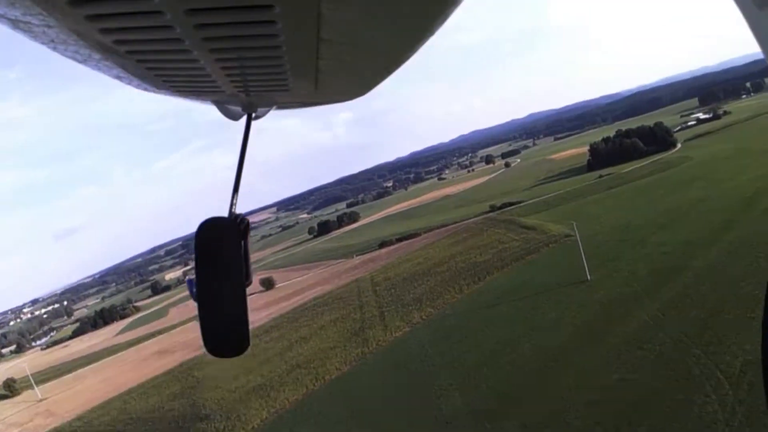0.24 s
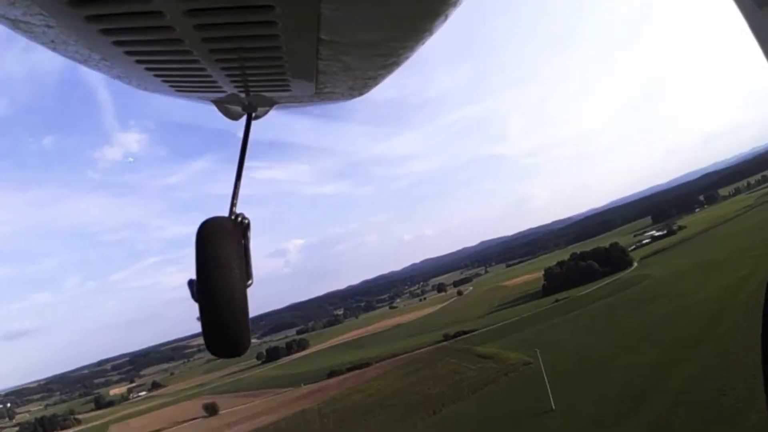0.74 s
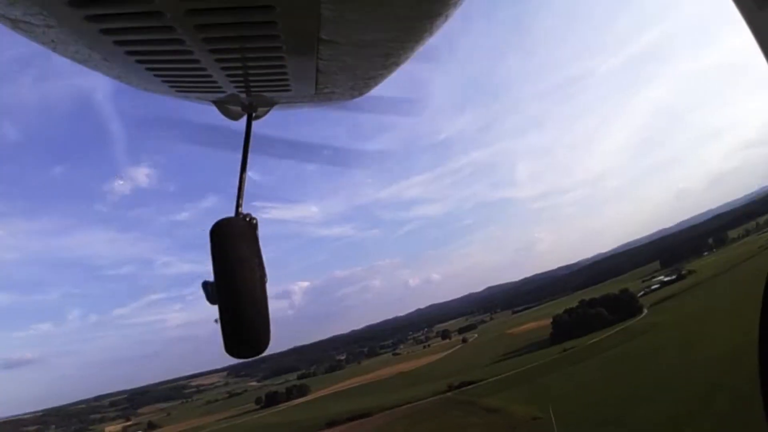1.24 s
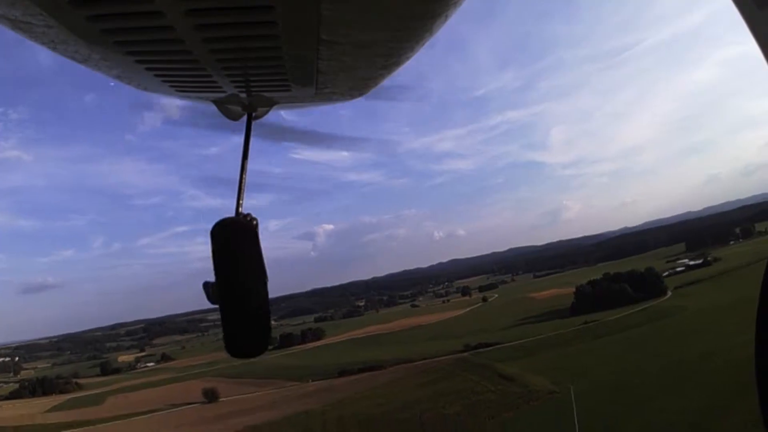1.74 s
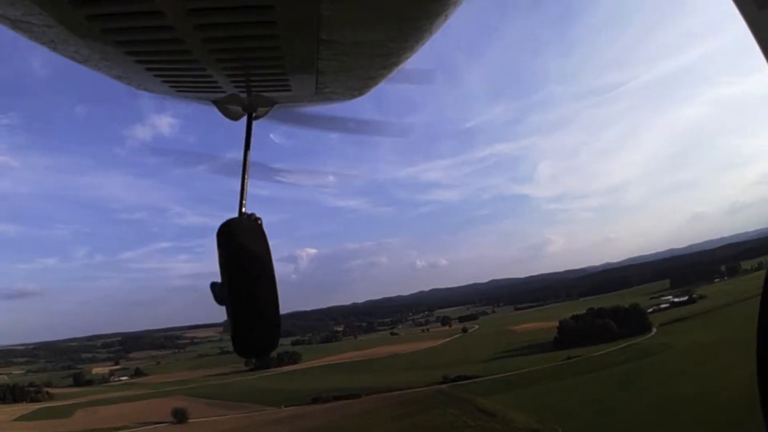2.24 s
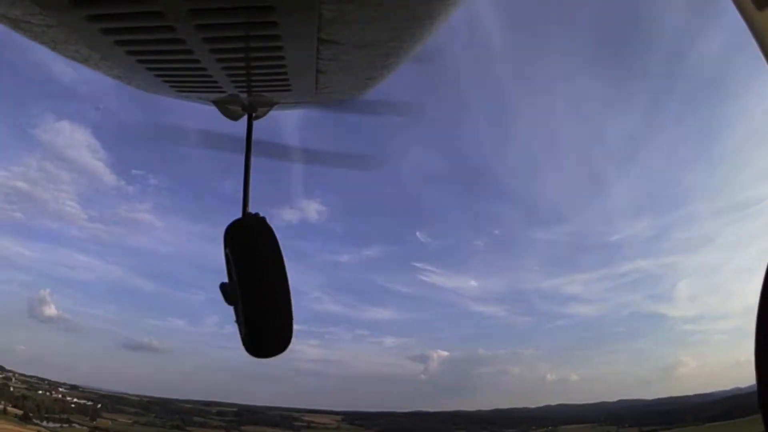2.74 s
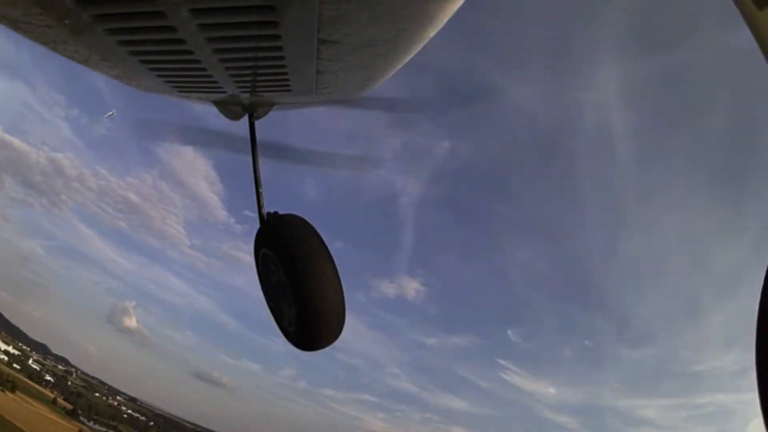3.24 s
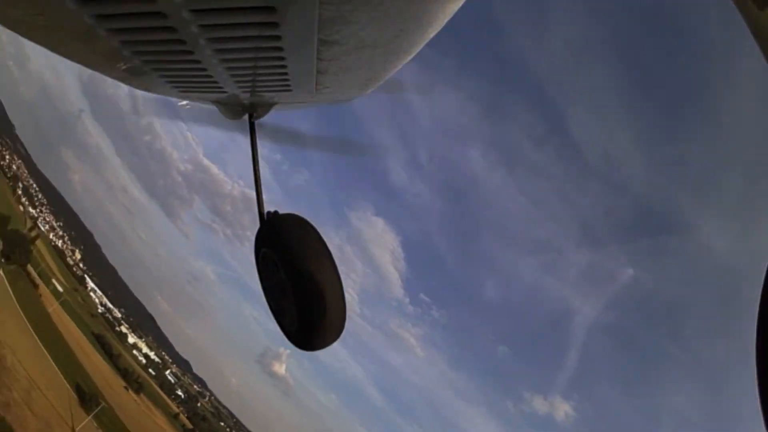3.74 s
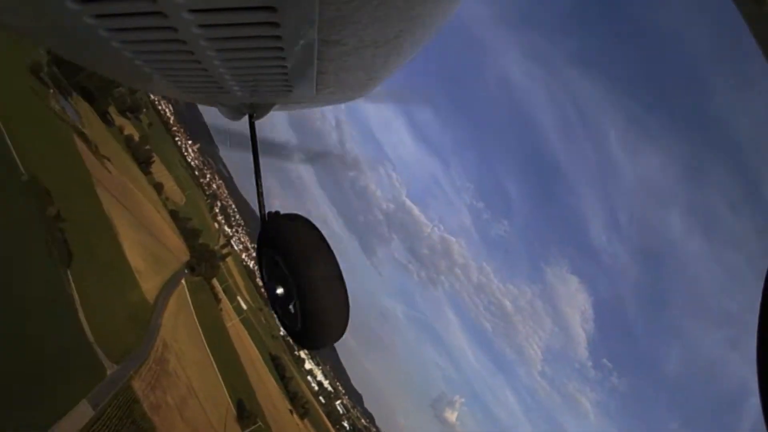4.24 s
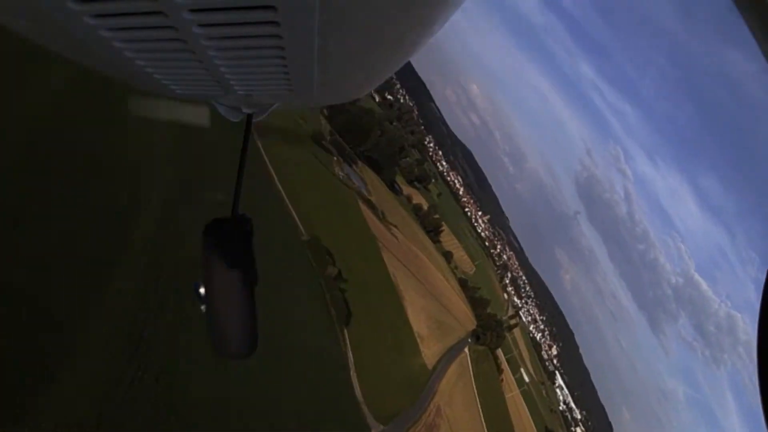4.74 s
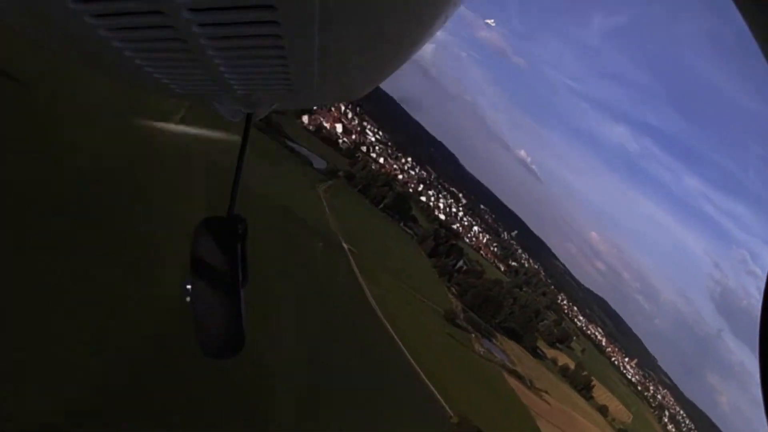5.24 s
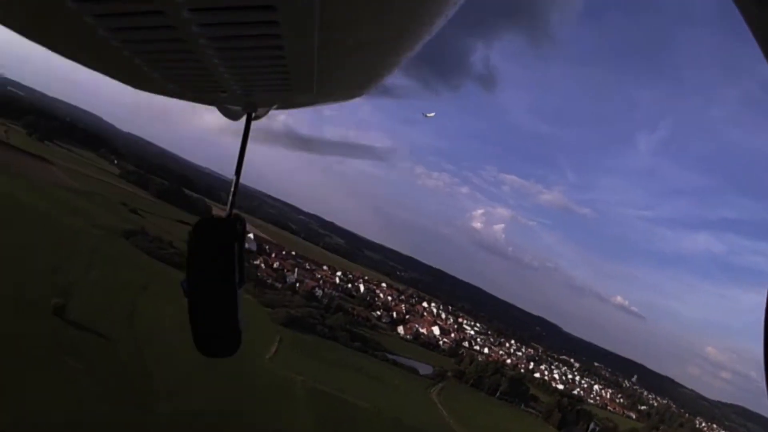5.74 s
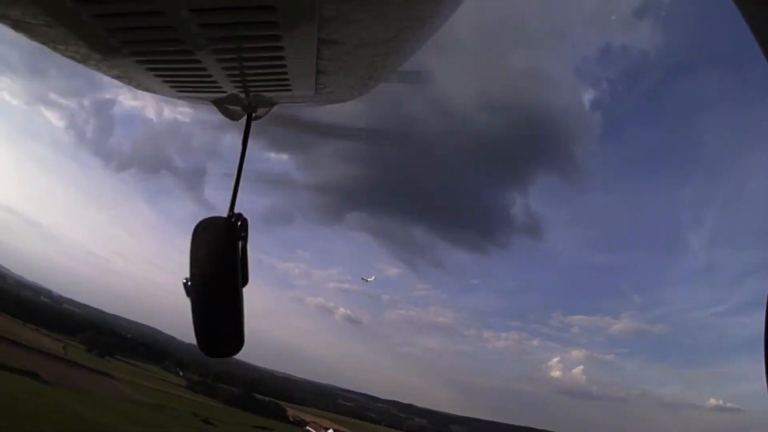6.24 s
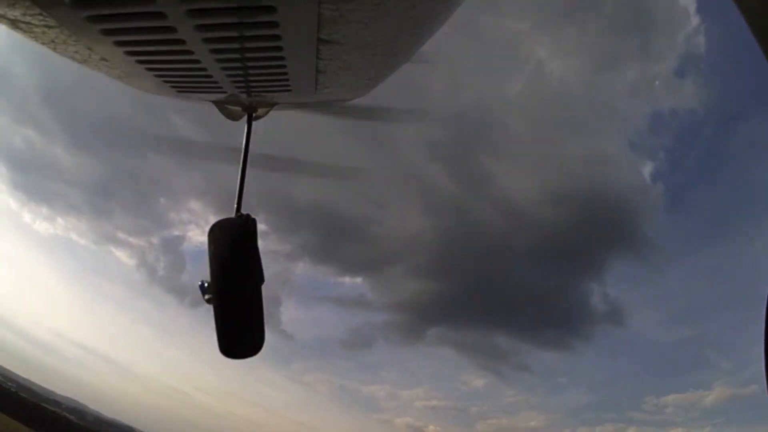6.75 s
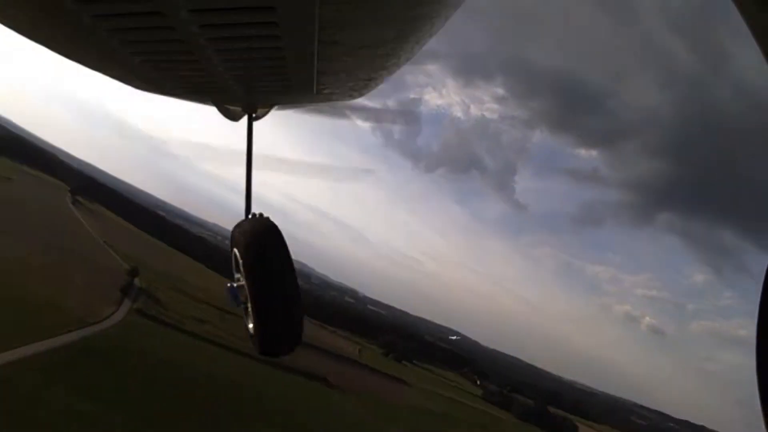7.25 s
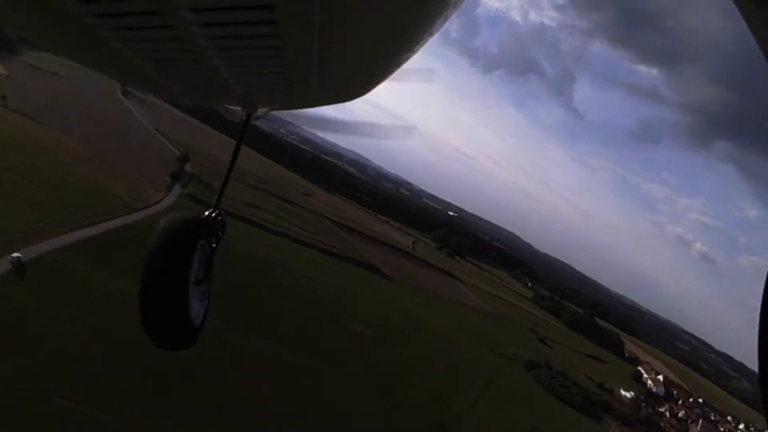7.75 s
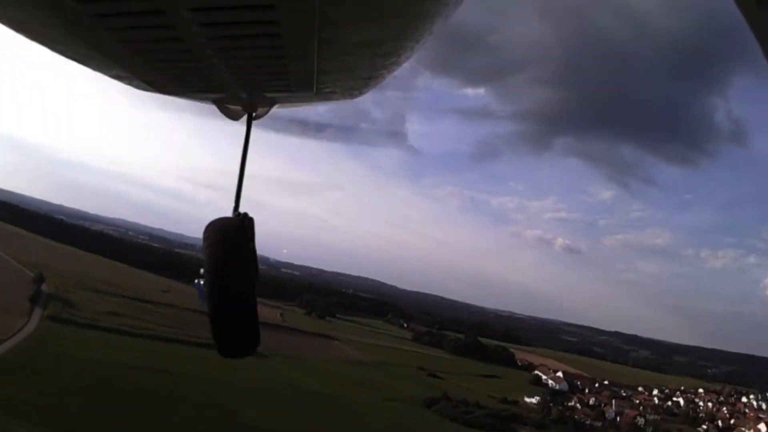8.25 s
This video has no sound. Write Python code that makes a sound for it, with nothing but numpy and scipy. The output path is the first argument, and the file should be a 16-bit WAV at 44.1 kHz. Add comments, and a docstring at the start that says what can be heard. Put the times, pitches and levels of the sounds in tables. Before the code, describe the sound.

A model plane's electric motor and propeller are heard in flight from a microphone under the airframe, out in the wind. For the first three seconds the propeller holds a steady, buzzy drone, mixed with low buffeting and a gusty rush of air. From about 3.1 seconds the throttle eases: the drone slides down in pitch and softens, the wind drops, and a thin, high electronic whistle joins the motor's whine. Around 4.1 to 4.9 seconds, as the pitch reaches its lowest point, a loose part buzzes and rattles in quick bursts. From about 4.7 seconds the motor climbs again in gradual steps and the drone fills back out. A second, lighter rattle comes at about 7.3 to 7.8 seconds. Near 8 seconds the pitch rises further and the wind swells, staying strong until the end at 8.5 seconds.

```python
"""Under an electric model plane

In flight, heard from a camera microphone under the airframe, close to the motor and out in the wind.
The two-blade propeller drones in rushing air. The throttle eases back: the pitch dips, the speed
controller whistles, the motor's magnets sing and a loose part buzzes. Then the plane gathers speed."""
import sys
import numpy as np
from scipy import signal
from scipy.fft import rfft, irfft
from scipy.io import wavfile
from scipy.ndimage import uniform_filter1d

SR = 44100
rng = np.random.default_rng(int(sys.argv[2]) if len(sys.argv) > 2 else 0)


def transcribe(signal):
    """Save signal, clipped to [-1, 1], as a 16-bit WAV file at the path in sys.argv[1]."""
    frames = np.atleast_2d(signal).T
    limited = np.clip(frames, -1, 1)
    pcm = np.round(limited * 32767).astype(np.int16)
    wavfile.write(sys.argv[1], SR, pcm)


N = 374850
TIME = np.arange(N) / SR

# Propeller speed in blade passes a second: time_s, blade_hz
BLADE_RATE = [(0, 150.5), (3.13, 150.4), (3.26, 144.2), (3.4, 135.7), (3.5, 131.1), (3.65, 127.6),
              (3.82, 124.6), (4.07, 118.6), (4.48, 112.8), (4.62, 112.2), (4.86, 117.7), (4.98, 120.2),
              (5.17, 122.2), (5.62, 122.8), (5.78, 125.3), (6, 127.3), (6.2, 127.7), (6.4, 130.8),
              (6.62, 132.3), (7.74, 131.9), (8, 139.2), (8.2, 142), (8.5, 143.3)]
# The two lowest propeller tones: time_s, blade_db, octave_db
DRONE_LEVELS = [(0, -39, -33), (0.75, -39.5, -34.5), (1.1, -36, -37.5), (1.45, -42, -37.5),
                (2.1, -37.5, -38.5), (2.68, -39.5, -36), (2.85, -40.5, -48), (3.45, -40, -51),
                (3.85, -53, -57), (4.2, -53, -70), (4.6, -43, -54), (5.05, -54, -50), (5.5, -46, -38),
                (6, -43.5, -38.5), (6.4, -36.5, -43.5), (7.2, -39.5, -41), (7.75, -38.5, -42.5),
                (8.15, -34.5, -38), (8.5, -38, -43)]
# Fourth propeller harmonic, swelling and fading: time_s, level_db
FOURTH_HARMONIC = [(0, -52), (0.65, -56), (1, -53), (1.6, -53), (2.1, -49.5), (2.6, -57), (3.3, -52),
                   (3.8, -61), (4.05, -51.5), (4.5, -56.5), (4.85, -58.5), (5.15, -69), (5.4, -50),
                   (5.62, -72), (6, -50), (6.5, -64.5), (7, -55), (7.35, -62), (7.9, -56), (8.5, -51)]
# Sixth propeller harmonic, coming and going: time_s, level_db
SIXTH_HARMONIC = [(0, -58.5), (2.5, -55.5), (3.1, -71), (4.2, -76), (4.5, -63), (4.9, -72), (6.6, -78),
                  (7.15, -56.5), (7.5, -66), (7.9, -79), (8.35, -49.5), (8.5, -49)]
# Other propeller harmonics: blade_multiple, level_db, share_of_octave_swell, speed_exponent
UPPER_HARMONICS = [(3, -47.5, 0, 10.1), (5, -63.5, 0, 2.7), (7, -66, 0.1, 7), (8, -60.5, 0.01, 3.7),
                   (9, -67, 0, 4), (10, -64, 0.24, 4.1)]

# The motor's magnetic tones: blade_multiple, level_db
MAGNET_TONES = [(7, -63), (10, -66), (11, -66), (12, -58.5), (14, -53), (14.5, -67), (28, -60.5),
                (29.5, -56), (31, -81), (33.5, -74)]
# The hum stands out at low speed and sinks as the motor pulls: blade_hz, gain_db
HUM_GAIN = [(112, -4), (119, -1), (123, -9.5), (131, -9.5), (150, -10.5)]
# How well the airframe radiates motor vibration: pitch_hz, gain_db
AIRFRAME_RESPONSE = [(790, -9), (835, 1.5), (1150, 7.5), (1340, 3), (1450, 10), (1530, -1), (1595, 0),
                     (1670, -1.5), (1720, 0), (1800, -5.5), (1900, -10), (2000, -1.5), (2150, -11),
                     (2400, -22), (2480, -3), (2590, 8.5), (2680, 2.5), (2850, -19), (3150, -8), (3300, -6),
                     (3470, -15), (3700, -8.5), (4100, -18), (5200, -11.5), (5310, 1.5), (5500, 4),
                     (5720, -2), (5900, -7), (6150, -4), (6320, -7)]
# Resonances of the falling beat tone, relative to the controller's whistle: pitch_hz, gain_db
FALLING_BEAT_RESPONSE = [(1590, -4), (1660, -15), (1730, -16), (1810, -23), (1950, -23), (2100, -30),
                         (2270, -34), (2440, -28), (2560, -16), (2680, -15.5), (2800, -21.5), (3000, -26),
                         (3230, -20), (3560, -33), (4500, -35)]
# Colour of the fizz around that whistle: frequency_hz, density_db
FIZZ_SPECTRUM = [(6000, -30), (6900, -10), (7500, 4), (8150, 4), (8400, -12), (8750, -34)]

# Single hard knocks of the loose part: time_s, force_db
HARD_KNOCKS = [(4.1003, -44), (4.194, -39), (4.2118, -37), (4.23, -36), (4.2553, -31), (4.2613, -34),
               (4.266, -35), (4.2992, -41), (4.3245, -37), (4.3333, -28.5), (4.3368, -29), (4.3403, -32),
               (4.376, -34), (4.394, -40), (4.4466, -34), (4.464, -32), (4.4812, -30), (4.534, -32),
               (4.6328, -26), (4.6685, -32), (4.747, -33), (7.277, -38), (7.307, -33.5), (7.3375, -34),
               (7.356, -36), (7.3855, -34), (7.4015, -40), (7.4378, -40), (7.4676, -34), (7.474, -37),
               (7.482, -34), (7.5042, -36), (7.5338, -47), (7.5643, -41), (7.5813, -40), (7.5994, -33),
               (7.619, -36), (7.6277, -34), (7.6402, -35), (7.678, -39), (7.754, -41), (7.7695, -39),
               (7.777, -40)]
# Its spells of buzzing: start_s, end_s, force_db, edge_db (extra on the modes near 4 kHz)
BUZZ_BURSTS = [(4.202, 4.44, -52, -6), (4.447, 4.485, -31.5, 1.5), (4.522, 4.701, -31, -3),
               (4.746, 4.76, -32.5, 1), (4.776, 4.86, -31, -3.5), (4.88, 4.935, -45, -11),
               (7.288, 7.526, -48.5, 1.5), (7.315, 7.365, -46, 2), (7.372, 7.408, -38, 1),
               (7.455, 7.5, -42, 2.5), (7.56, 7.635, -43, 1.5), (7.677, 7.68, -47, 3),
               (7.748, 7.8, -45, -2)]
# Its ringing modes: pitch_hz, gain_db, t60_s
PART_MODES = [(1470, -8, 0.011), (2200, -8, 0.0038), (2650, -7, 0.0057), (3105, -3, 0.0076),
              (3600, -9, 0.0038), (4050, -7, 0.0058), (4520, -16, 0.0033), (5580, -17, 0.0064),
              (6480, -16, 0.007), (7450, -19, 0.0094), (8250, -24, 0.0059), (8970, -24, 0.012),
              (12300, -24, 0.0044)]

# Airflow over the camera, relative to level flight: time_s, flow_db
FLOW_STRENGTH = [(0, 0.1), (0.5, -0.2), (1.25, 1.5), (1.75, -0.5), (2.42, 2), (2.85, -3.5), (3.35, -4),
                 (3.8, -9.5), (4.6, -6), (5.1, -6.5), (5.7, -3), (6.9, -3), (7.75, -4.5), (8.15, 2),
                 (8.5, 3)]
# Low buffeting at the microphone: frequency_hz, density_db
BUFFET_SPECTRUM = [(8, 5.5), (20, 0.5), (60, 4.5), (110, 3.5), (140, 3), (190, -6.5), (400, -50)]
# Low-mid eddies: frequency_hz, density_db
EDDY_SPECTRUM = [(80, -17.5), (140, -7.5), (190, -1), (260, -5.5), (350, -8), (430, -12), (540, -14),
                 (700, -21), (1200, -44)]
# Midrange rush of air: frequency_hz, density_db
RUSH_SPECTRUM = [(400, -22), (650, -5.5), (820, -2), (1000, 2.5), (1300, 4), (1550, 0.5), (1850, -10.5),
                 (2300, -14), (2700, -4.5), (3150, -8), (3550, -17.5), (4300, -20), (5200, -25.5),
                 (8000, -59)]
# High hiss of air: frequency_hz, density_db
HISS_SPECTRUM = [(3000, -4.5), (4800, -7.5), (5400, 4), (6300, 1.5), (6900, -2.5), (7650, 7), (8100, 1.5),
                 (8700, -13.5), (9500, -3.5), (11000, -10), (11800, -36), (12500, -43)]
# The wind changes colour, as in a turn: start_s, end_s, buffet_db, eddies_db, hiss_db
WIND_SWERVES = [(1.513, 1.688, -2, -4, 0), (3.555, 4.117, -1, 0.5, -0.5), (4.112, 4.95, -2.5, -3, -7),
                (7.14, 7.76, -3.5, -5, -8), (8.06, 8.7, 1.5, -5.5, 1)]
# A faint wandering whistle late in the flight: time_s, pitch_hz, level_db
FAINT_WHISTLE = [(6.3, 955, -90), (6.65, 980, -60), (7, 1004, -56), (7.3, 954, -68), (7.65, 953, -62),
                 (7.95, 1010, -88)]


def propeller(blade_hz, passes):
    """Blade tones at close range; turbulent inflow shakes them, and the upper ones fade as they slow."""
    blade_db, octave_db = in_time(DRONE_LEVELS)
    shaken = passes + 0.0075 * drift(rate=30)
    drone = from_db(blade_db) * partial(shaken, flutter_db=-1.2, rate=17.5)
    drone += from_db(octave_db) * partial(2 * shaken, flutter_db=1, rate=7)
    for k, levels in ((4, FOURTH_HARMONIC), (6, SIXTH_HARMONIC)):
        drone += from_db(in_time(levels)[0]) * partial(k * shaken, flutter_db=1.5, rate=8.2)
    swell_db = octave_db - octave_db.max()
    speed = blade_hz / blade_hz.max()
    for k, db, share, exponent in UPPER_HARMONICS:
        gain = from_db(db + share * swell_db) * speed ** exponent
        drone += gain * partial(k * shaken, flutter_db=1, rate=2.9)
    return drone


def motor(blade_hz, passes, braking_db=-2, cogging_db=-61):
    """Magnetic hum and cogging come through the airframe, joined by the controller's whistle."""
    cog_steps = 42 * passes  # the cogs pull 84 times a turn
    slowing_hz_per_s = -uniform_filter1d(np.gradient(blade_hz) * SR, size=SR // 10)
    braking = np.clip(slowing_hz_per_s / 49, 0, 1) ** 2
    hum_db = np.interp(blade_hz, *np.transpose(HUM_GAIN)) + braking_db * braking
    hum = from_db(hum_db) * sum(from_db(db) * radiated(k * passes) for k, db in MAGNET_TONES)
    cogging = from_db(cogging_db) * radiated(cog_steps)
    return hum + cogging + speed_controller(blade_hz, cog_steps, slowing_hz_per_s)


def speed_controller(blade_hz, cog_steps, slowing_hz_per_s, switching_hz=7840, half_speed_db=-38):
    """Chopped current whistles at part throttle and falls silent at full speed."""
    chops = switching_hz * TIME
    chopping = np.sin(np.pi * blade_hz / blade_hz.max())
    whistle = partial(chops, flutter_db=0.2, rate=27)
    fizz = from_db(-16.5) * noise(FIZZ_SPECTRUM)
    # Chopping beats with the rotation: as the motor slows, one tone rises, one falls and both swell.
    rising = from_db(-23.5) * radiated(chops - cog_steps)
    falling = radiated(2 * cog_steps - chops, FALLING_BEAT_RESPONSE)
    swell = from_db(2.5 * np.clip(slowing_hz_per_s / 12, -1, 1))
    return from_db(half_speed_db) * chopping * (whistle + fizz + swell * (rising + falling))


def radiated(cycles, resonances=AIRFRAME_RESPONSE):
    """A motor vibration swells as it glides through resonances."""
    pitch_hz = np.gradient(cycles) * SR
    return from_db(at_hz(resonances, pitch_hz)) * partial(cycles, flutter_db=0.9, rate=14)


def airflow(passes):
    """Air tumbles over the camera case; the propeller wash pulses it, the two blades not quite alike."""
    flow_db, = in_time(FLOW_STRENGTH)
    buffet_db, eddies_db, hiss_db = swerves()
    wash = rms_one(sum(np.cos(np.pi * k * passes) for k in range(1, 5)))  # first four shaft orders
    gusts = drift(rate=16)
    # Each band has its level in level flight, then follows the airflow by its own share.
    buffet = from_db(-35.5 + 0.55 * flow_db + buffet_db + 0.46 * drift(rate=1.9)) * noise(BUFFET_SPECTRUM)
    eddies = from_db(-36.5 + 1.335 * flow_db + eddies_db + 0.5 * gusts) * noise(EDDY_SPECTRUM)
    rush = from_db(-46 + 0.97 * flow_db + 0.5 * gusts + 0.26 * wash) * noise(RUSH_SPECTRUM)
    hiss = from_db(-55 + 0.95 * flow_db + hiss_db + 0.59 * gusts + 0.76 * wash) * noise(HISS_SPECTRUM)
    return buffet + eddies + rush + hiss


def swerves(ease_s=0.24):
    """Each swerve eases in, holds and eases out: dB on the buffeting, the eddies and the hiss."""
    return sum(np.outer(db, np.clip(0.5 + np.minimum(TIME - start, end - TIME) / ease_s, 0, 1))
               for start, end, *db in WIND_SWERVES)


def loose_part(passes):
    """Something loose in the airframe rings at every contact; only hard taps reach its top modes."""
    buzz_db, edge_db = bursts()
    gentle_db = 0.72 * (buzz_db - buzz_db.max())  # 0 at the hardest shaking, negative below it
    contact = contacts(passes, buzz_db, gentle_db)
    soft_edge = signal.butter(2, 5800, fs=SR, output="sos")
    buzz = np.zeros(N)
    for hz, mode_db, t60 in PART_MODES:
        strikes = contact * from_db(mode_db) * rng.choice([-1., 1.], N)
        if hz > 5000:
            dulling_db = gentle_db * min((hz - 2000) / 5000, 1)
            buzz += ring(strikes * from_db(dulling_db), hz, t60)
        else:
            edge = from_db(edge_db * (hz > 3400))
            buzz += signal.sosfilt(soft_edge, ring(strikes * edge, hz, t60))
    return signal.sosfilt(signal.butter(3, [1100, 10500], "band", fs=SR, output="sos"), buzz)


def contacts(passes, buzz_db, gentle_db, scatter_s=0.0003, rebound_s=0.0011, ticks_per_s=410):
    """The part taps once a blade pass, and on the way back if shaken hard; fine ticks fall between."""
    beats = np.flatnonzero(np.diff(np.floor(2 * passes)))
    way_back = np.arange(len(beats)) % 2
    time_chance, force_chance = rng.standard_normal((len(beats), 2)).T
    spread_db = 1.5 + 0.12 * np.minimum(-gentle_db[beats], 10)  # gentle taps are more uneven
    tap_db = buzz_db[beats] + way_back * gentle_db[beats] + spread_db * force_chance
    knock_s, knock_db = np.transpose(HARD_KNOCKS)
    strike_s = np.r_[beats / SR + scatter_s * time_chance, knock_s]
    force_db = np.r_[tap_db, knock_db]
    taps = clicks_at(strike_s, force_db)
    bounce_s = strike_s + rebound_s * rng.uniform(0.5, 1.5, len(strike_s))
    rebounds = clicks_at(bounce_s, force_db - 6) * from_db(0.5 * gentle_db)  # hard taps bounce once
    ticking = rng.random(N) < ticks_per_s / SR
    ticks = ticking * from_db(np.minimum(buzz_db, -45) + 2 * rng.standard_normal(N))
    return taps + rebounds + ticks + from_db(-10) * chatter(taps)


def chatter(taps, decay_s=0.0013):
    """The contact chatters for about a millisecond after each strike."""
    r = np.exp(-1 / (decay_s * SR))
    return signal.lfilter([0, np.sqrt(1 - r * r)], [1, -r], taps + 1e-18)


def bursts(rise_db_per_s=900, fall_db_per_s=600):
    """Each burst rises fast, holds and dies away; the strongest sets the taps' force and edge (dB)."""
    levels = np.array([db - rise_db_per_s * np.maximum(start - TIME, 0)
                       - fall_db_per_s * np.maximum(TIME - end, 0) for start, end, db, _ in BUZZ_BURSTS])
    edge_db = np.array(BUZZ_BURSTS)[levels.argmax(axis=0), 3]
    return np.maximum(levels.max(axis=0), -120), edge_db


def stray_whistle():
    """A faint, unsteady tone in the background that does not follow the shaft."""
    hz, db = in_time(FAINT_WHISTLE)
    return from_db(db) * partial(np.cumsum(hz) / SR, flutter_db=4, rate=10)


def from_db(db):
    """Decibels to gain."""
    return 10 ** (np.asarray(db) / 20)


def rms_one(x):
    """Scale to rms 1."""
    return x / np.sqrt(np.mean(x ** 2) + 1e-20)


def in_time(rows):
    """The columns of a curve table at every sample."""
    time_s, *columns = np.transpose(rows)
    return [np.interp(TIME, time_s, column) for column in columns]


def at_hz(points, hz):
    """Read a spectrum on a log-frequency axis."""
    point_hz, db = np.transpose(points)
    return np.interp(np.log(np.maximum(hz, 1)), np.log(point_hz), db)


def noise(spectrum):
    """Noise of the given colour, falling away above its last point; rms 1."""
    hz = np.arange(N // 2 + 1) * SR / N
    skirt = 1 / np.maximum(1, hz / spectrum[-1][0]) ** 2
    white = rfft(rng.standard_normal(N))
    return rms_one(irfft(white * from_db(at_hz(spectrum, hz)) * skirt, N))


def drift(rate, hop=40):
    """Smooth random wander with about `rate` turns a second; spread 1."""
    r = np.exp(-2 * np.pi * hop * rate / SR)
    slow = signal.lfilter([1], [1, -2 * r, r * r], rng.standard_normal(N // hop + 2002))[2000:]
    return np.interp(np.arange(N) / hop, np.arange(len(slow)), rms_one(slow))


def partial(cycles, flutter_db, rate):
    """A sine of rms near 1 whose strength flutters."""
    return np.sqrt(2) * np.sin(2 * np.pi * (cycles + rng.random())) * from_db(flutter_db * drift(rate))


def ring(clicks, hz, t60):
    """A unit click sets a sine of height 1 ringing."""
    r, w = from_db(-60 / (t60 * SR)), 2 * np.pi * hz / SR
    return signal.lfilter([0, np.sin(w)], [1, -2 * r * np.cos(w), r * r], clicks + 1e-18)


def clicks_at(time_s, db):
    """Single clicks at the given times and levels."""
    clicks = np.zeros(N)
    clicks[np.clip((time_s * SR).astype(int), 0, N - 1)] = from_db(db)
    return clicks


def scene():
    """Under the plane, in mono: one shaft times the propeller, the motor, the wash and the buzz."""
    blade_hz, = in_time(BLADE_RATE)
    passes = np.cumsum(blade_hz * (1 + 0.000413 * drift(rate=8.67))) / SR  # blade passes so far
    drive = propeller(blade_hz, passes) + motor(blade_hz, passes)
    return (drive + airflow(passes) + stray_whistle() + loose_part(passes))[None]


def record(dry):
    """The small on-board camera cuts the top steeply above 12.4 kHz."""
    return signal.sosfilt(signal.ellip(10, 0.1, 80, 12400, fs=SR, output="sos"), dry)


dry = scene()
out = record(dry)
transcribe(out)
```